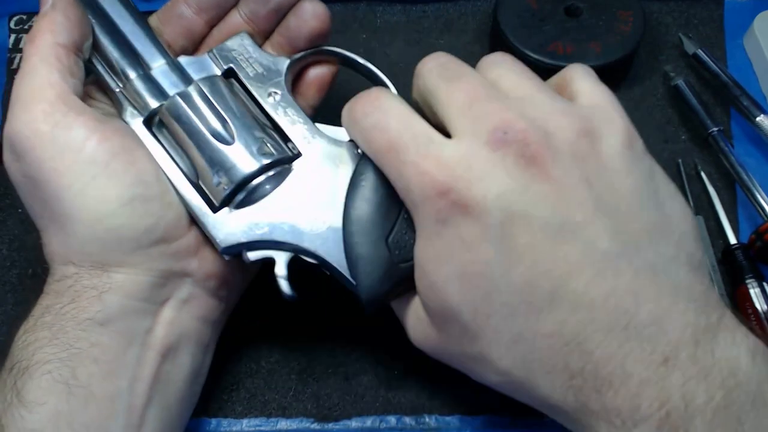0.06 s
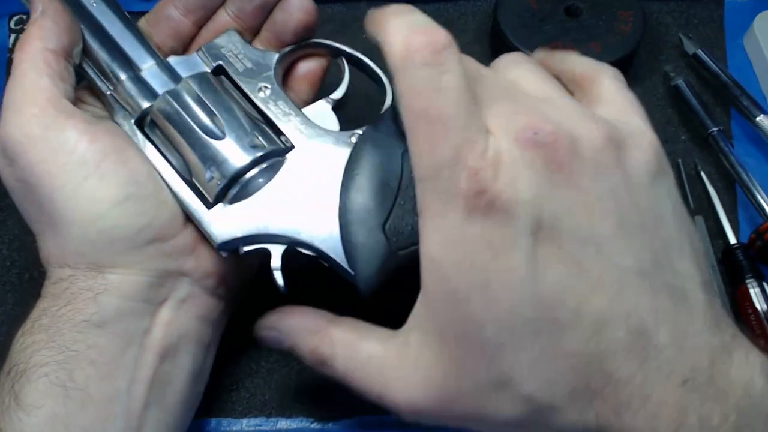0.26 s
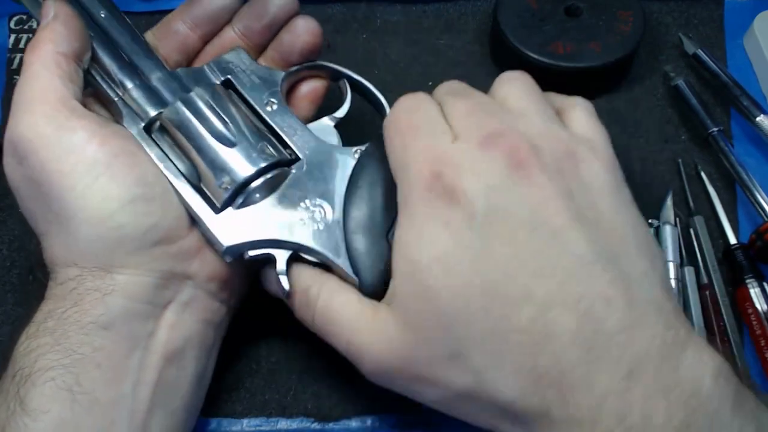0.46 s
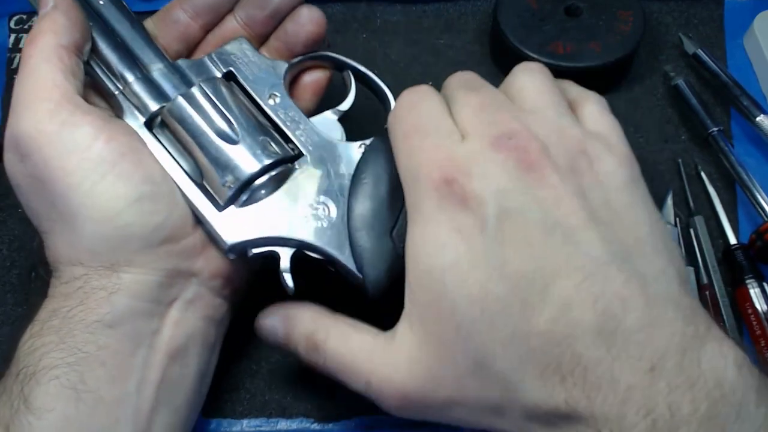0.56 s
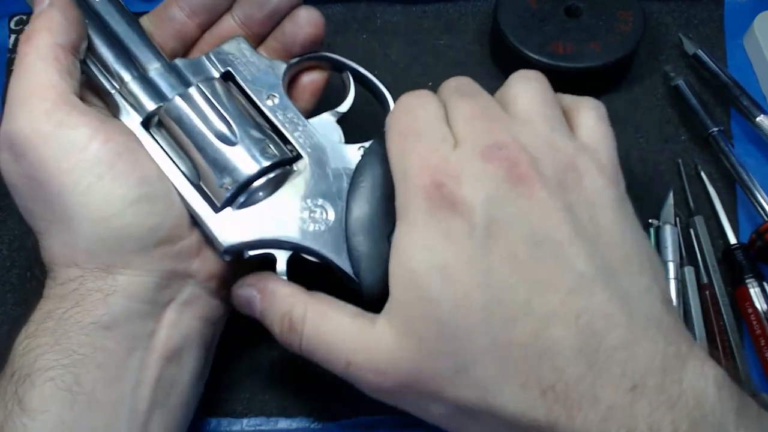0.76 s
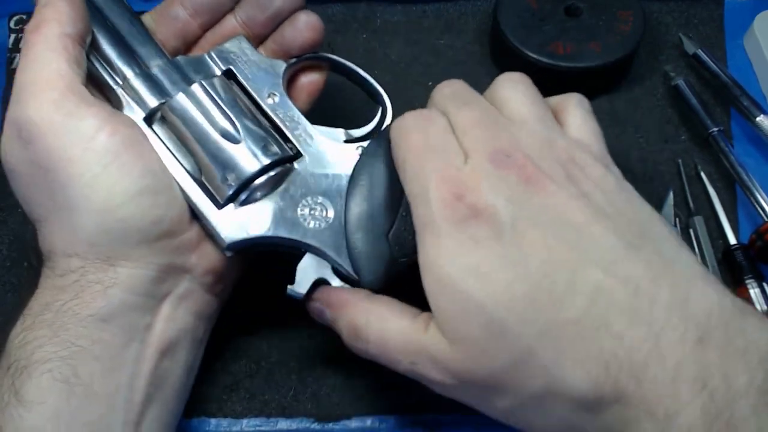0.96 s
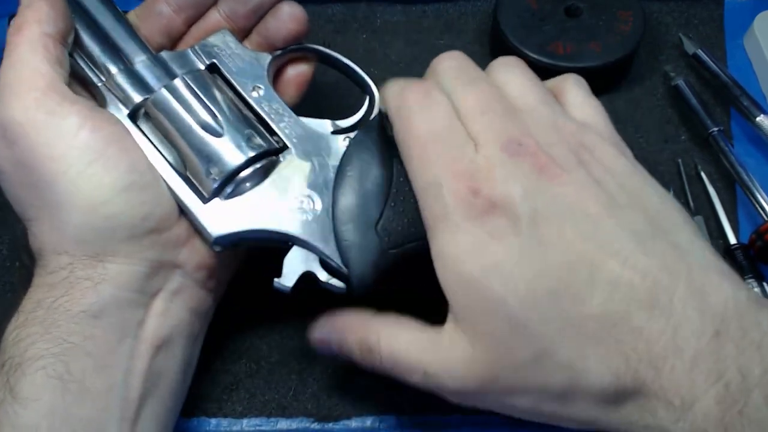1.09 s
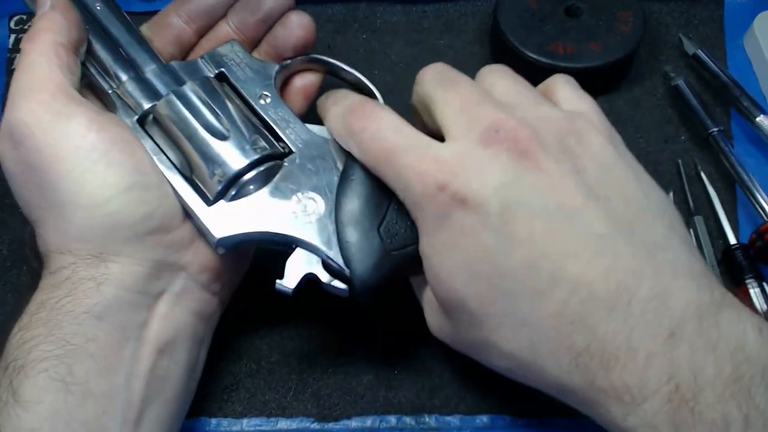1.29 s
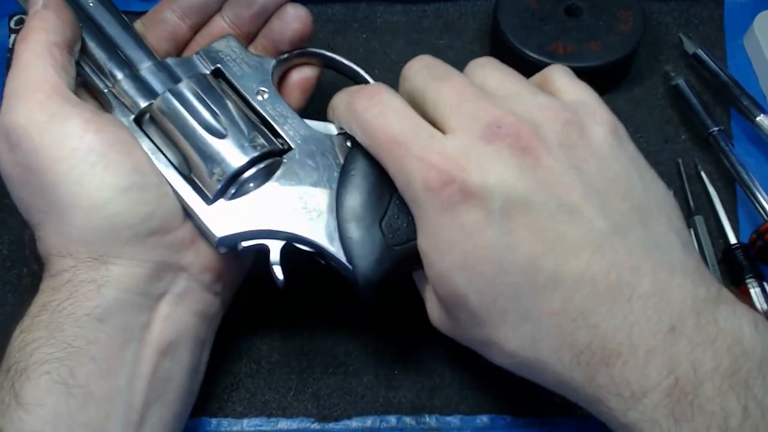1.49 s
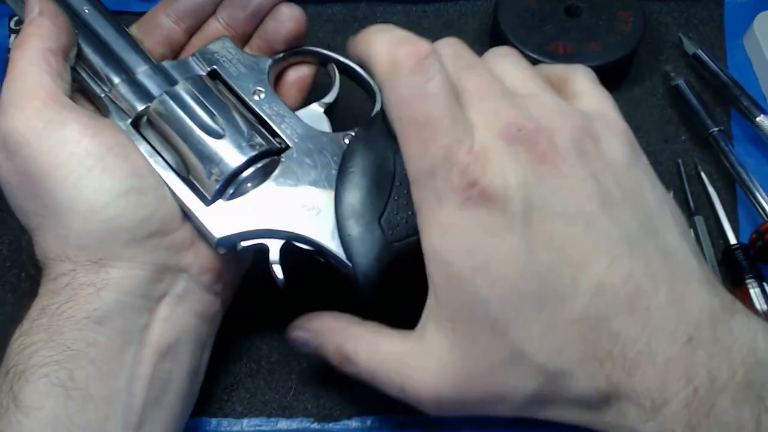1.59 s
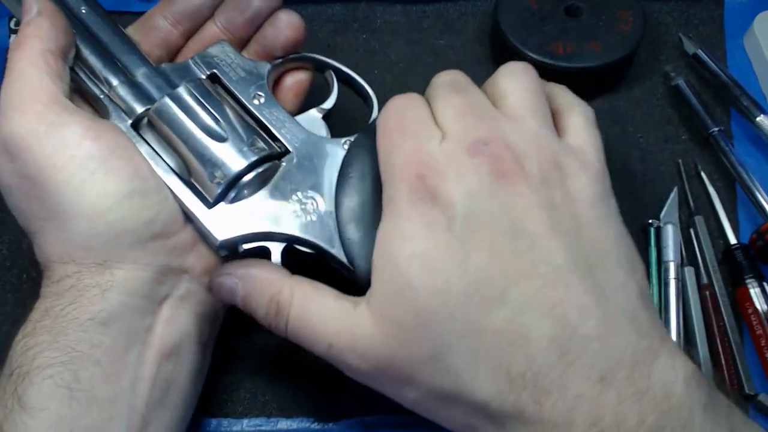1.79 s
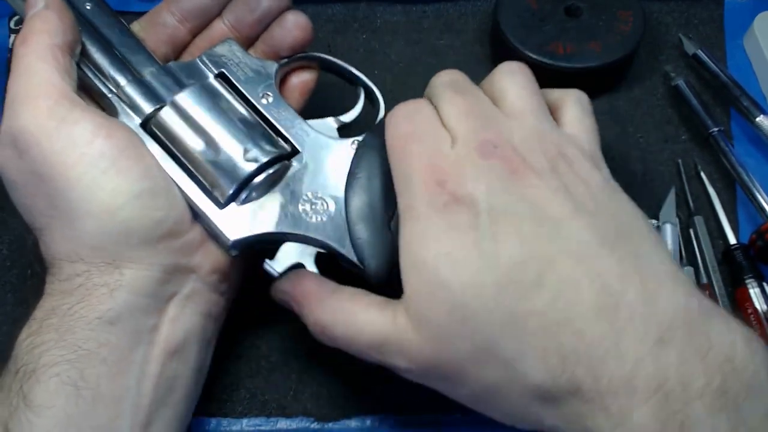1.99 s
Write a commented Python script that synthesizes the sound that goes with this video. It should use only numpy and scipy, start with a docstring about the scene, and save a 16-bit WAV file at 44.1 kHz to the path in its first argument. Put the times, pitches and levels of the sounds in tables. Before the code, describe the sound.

An empty revolver's hammer snaps twice, with crisp metallic trigger and cocking clicks.

```python
"""A faint rub of skin, then the sharp steel snap of a revolver's hammer, close to the microphone.
The trigger springs back, the hammer is thumbed to full cock with ticks and a knock, and both snap again.
Each impact is a burst of contact noise; the heavier ones also excite damped modes of the steel.
A bench and a small room with a faint fan hum reflect the clicks, and the loudest overload the recorder."""
import sys
import numpy as np
from scipy import signal
from scipy.fft import rfft, irfft, next_fast_len
from scipy.io import wavfile
from scipy.ndimage import map_coordinates

SR = 44100
rng = np.random.default_rng(int(sys.argv[2]) if len(sys.argv) > 2 else 0)


def int16_out(signal):
    """Quantize to a 16-bit WAV file."""
    q = np.round(np.clip(np.atleast_2d(signal).T, -1, 1) * 32767)
    wavfile.write(sys.argv[1], SR, q.astype(np.int16))


N = 90404
TAIL = SR // 4  # samples allowed for a decay
TOP_HZ, TICK_T60_S = 15650, 0.012  # upper band limit; decay time of a light contact

# spectrum of a light steel contact (f/Hz, level/dB)
TICK_SPECTRUM = [(100, -29), (1200, -13.5), (1900, -12.5), (2600, 1), (5000, -6.5), (7300, 3.5),
                 (10000, -5.5), (15500, 0)]


def hammer(contacts=3, rebound_s=0.0065, scatter_s=0.0003, loss_db=2.5):
    """Inelastic impact: the hammer strikes and rebounds, each weaker contact ringing the frame."""
    # hammer falls (t/s, level/dB, ring/dB, thump/dB)
    falls = [(0.2086, 2.5, 2.5, 3.5), (1.5492, 2.5, 0.5, -10)]
    # spectrum of the hammer's contact (f/Hz, level/dB)
    spectrum = [(40, -18.5), (230, -14.5), (380, -8.5), (600, -13), (1200, -9), (2600, 1.5), (5600, -2),
                (8000, 4), (11500, -2), (14800, 2.5)]
    # modes of the steel frame (f/Hz, level/dB, T60/s)
    frame_modes = [(2465, -5, .05), (2560, -3, .06), (2911, -1, .06), (2998, -2, .06), (3375, -5, .1),
                   (3645, -3, .08), (3860, -4, .1), (4965, -3, .1), (5400, -6, .09), (6519, -4, .09),
                   (7006, -1, .085), (7090, -4, .07), (7865, -5, .1), (8057, 0, .08), (8547, 0, .085),
                   (8675, -4, .07), (9114, -4, .07), (10107, -4, .08), (13675, -2, .085), (13825, -2, .09),
                   (14483, -2, .09), (14760, -2, .085), (15221, -2, .08)]
    # modes of the whole gun, damped by the hand (f/Hz, level/dB, T60/s)
    thump_modes = [(357, 0, 0.035), (530, 0, 0.055), (759, 1.5, 0.058), (1450, 1, .045)]
    out = np.zeros(N)
    for s, db, ring_db, thump_db in falls:
        blow = amp(thump_db - 21) * ring(thump_modes)
        for k in range(contacts):
            contact = clatter(spectrum, t60=0.028) + amp(ring_db - 17) * ring(frame_modes)
            delay_s = k * (rebound_s + scatter_s * rng.standard_normal())
            add(blow, delay_s, amp(-k * loss_db) * contact)
        sear = amp(db - 21) * clatter(TICK_SPECTRUM, TICK_T60_S)
        add(out, s - 0.0045, sear)  # the sear lets go just before the blow
        add(out, s, amp(db) * in_room(blow, wet_db=-1))
    return out


def trigger(slide_s=0.007, rise_s=0.0029):
    """Sliding friction, then impact: the released trigger scrapes forward and rings against its stop."""
    # trigger returns (t/s, level/dB, ring/dB, tilt/(dB per octave))
    returns = [(.348, -1.5, 5.5, -0.6), (1.6854, -2, 1, 0)]
    # spectrum of the contact with the stop (f/Hz, level/dB)
    spectrum = [(200, -10), (560, -16), (850, -2.5), (1300, -3), (1900, -6.5), (2600, 2), (3600, 2.5),
                (5500, -0.5), (8000, 1.5), (10500, -3), (13300, -3.5), (16000, -6.5)]
    # steel modes that the trigger excites (f/Hz, level/dB, T60/s)
    modes = [(2620, -1, 0.07), (2990, -3, .07), (3600, -3, .09), (3785, -2, 0.1), (3912, -3, 0.1),
             (5100, -6, 0.07), (6330, -3, 0.1), (6457, -2, .09), (7720, -2, 0.07), (9100, -5, .06),
             (12350, -5, .07), (13550, -4, .07)]
    out = np.zeros(N)
    t = np.arange(TAIL) / SR
    slide = np.minimum(t / rise_s, 1) ** 2 * (t < slide_s)
    for s, db, ring_db, tilt_db in returns:
        contact = clatter(tilted(spectrum, tilt_db), t60=0.014)
        snap = low_cut(contact + amp(ring_db - 24.5) * ring(modes), edge_hz=219.2)
        add(out, s - slide_s, amp(db - 17) * slide * noise(TICK_SPECTRUM, TAIL))
        add(out, s, amp(db) * in_room(snap, wet_db=-1))
    return out


def cocking():
    """Impulsive excitation: the cylinder knocks against its stop and the sprung sear snaps in."""
    # impacts of cylinder stop and sear (t/s, level/dB, ring/dB, knock/dB, spring/dB)
    impacts = [(1.0544, -8.5, -4, 0.5, -16), (1.0602, -18, -10, -21, -18), (1.0655, -10.5, 1.5, -8.5, -0.5)]
    # spectrum of these contacts (f/Hz, level/dB)
    spectrum = [(200, -22), (600, -9), (780, -2), (1900, 0), (3000, 1), (5000, -2.5), (8400, 0),
                (10000, -7), (15500, -4)]
    # ringing modes of the cylinder (f/Hz, level/dB, T60/s)
    cylinder_modes = [(870, -7, 0.045), (1620, -4, .05), (1810, -4, 0.06), (3790, -5, .09), (3900, -3, 0.1),
                      (3990, -5, 0.07), (5200, -5, 0.05), (7970, -5, .055), (8135, -7, .05),
                      (8320, -6, 0.05)]
    # heavily damped modes of the cylinder hitting its stop (f/Hz, level/dB, T60/s)
    knock_modes = [(830, -3, .016), (1290, 1, 0.0093), (1650, 1.5, 0.019), (2100, -0.5, 0.0092),
                   (2900, -3, .013)]
    # modes of the sear spring (f/Hz, level/dB, T60/s)
    spring_modes = [(3750, -1.5, 0.015), (3970, -0.5, 0.014)]
    out = np.zeros(N)
    for s, db, ring_db, knock_db, spring_db in impacts:
        knock = amp(knock_db - 1) * ring(knock_modes)
        spring = amp(spring_db + 7) * ring(spring_modes)
        steel = clatter(spectrum, t60=0.01) + amp(ring_db - 13.5) * ring(cylinder_modes)
        click = low_cut(knock + spring + steel, edge_hz=630)
        add(out, s, amp(db) * in_room(click, wet_db=-2.5))
    return out


def pawl():
    """Light impacts: the pawl and other loose parts radiate brief broadband ticks."""
    # ticks (t/s, level/dB, tilt/(dB per octave))
    ticks = [(.521, -57.5, -5), (.595, -54.5, -7), (0.697, -57.5, -2), (0.964, -57, -1), (0.982, -48, 0),
             (0.989, -45, 0.5), (1.0034, -38.5, -4.5), (1.0232, -27, 0), (1.049, -47, -5.5),
             (1.201, -51, -7), (1.215, -52, -10), (1.236, -56.5, 4), (2.042, -34, -4.5)]
    out = np.zeros(N)
    for s, db, tilt_db in ticks:
        tick = clatter(tilted(TICK_SPECTRUM, tilt_db), TICK_T60_S)
        add(out, s, amp(db) * in_room(tick, wet_db=2))
    return out


def clatter(spectrum, t60, hold_s=0.0018):
    """Modal overlap: a contact's dense resonances merge into noise that holds briefly, then decays."""
    envelope = np.minimum(1, decay(t60) * np.exp(np.log(1000) * hold_s / t60))
    return envelope * noise(spectrum, TAIL)


def ring(modes, linewidth_hz=14):
    """Free vibration: damped modes start from rest; loose parts broaden each line by phase diffusion."""
    t = np.arange(TAIL) / SR
    out = np.zeros(TAIL)
    for k, (hz, db, t60) in enumerate(modes):
        phase_walk = np.cumsum(rng.standard_normal(TAIL)) * np.sqrt(2 * np.pi * linewidth_hz / SR)
        out += (-1) ** k * amp(db) * decay(t60) * np.sin(2 * np.pi * hz * t + phase_walk)
    return out


def low_cut(x, edge_hz):
    """Radiation efficiency: a small part gives off little sound below edge_hz."""
    return signal.sosfilt(signal.butter(4, edge_hz, "high", fs=SR, output="sos"), x)


def hands():
    """Friction noise: skin on the frame and grip swells and fades with each movement."""
    # rubs on the frame (t/s, duration/s, level/dB)
    rubs = [(.005, 0.086, -41.5), (1.279, 0.015, -45.5), (1.295, 0.095, -41), (1.365, 0.024, -48)]
    # spectrum of skin on steel (f/Hz, level/dB)
    rub_spectrum = [(200, -19), (700, -9), (1150, 3), (1600, -7), (2600, -20.5), (5000, -27), (9000, -26.5),
                    (15000, -43)]
    # shifts of the hand on the grip (t/s, duration/s, level/dB)
    shifts = [(.44, .3, -65.5), (1.77, 0.33, -70)]
    # spectrum of skin on the grip (f/Hz, level/dB)
    shift_spectrum = [(200, -5), (2000, -2), (6500, -1), (15000, -16)]
    t = np.arange(N) / SR
    out = np.zeros(N)
    for strokes, spectrum in (rubs, rub_spectrum), (shifts, shift_spectrum):
        friction = noise(spectrum, N)
        for s, duration, db in strokes:
            progress = np.clip((t - s) / duration, 0, 1)
            out += amp(db) * np.sin(np.pi * progress) * friction
    return out


def in_room(x, wet_db, bench_db=-9, bench_t60=0.098, room_db=-12.5, delay_s=0.006, size=256):
    """Diffuse reverberation follows x: each band's energy decays fast at the bench, slower in the room."""
    # reverberation time of the room (f/Hz, T60/s)
    room_t60 = [(200, 0.36), (1000, 0.18), (3500, 0.23), (8000, 0.17), (15000, 0.11)]
    # spectral weighting of the reflections (f/Hz, level/dB)
    spectrum = [(200, -9), (1000, -3.5), (3000, -2), (8000, -2.5), (15000, 0.5)]
    hz, t, direct = signal.stft(np.pad(x, (0, TAIL)), SR, nperseg=size)

    def linger(t60):
        """Exponential energy decay, normalised to unit sum."""
        rate = np.log(1e6) / t60
        return np.exp(-rate * t) * (1 - np.exp(-rate * t[1]))

    early = amp(bench_db) ** 2 * linger(bench_t60)
    late = amp(room_db) ** 2 * linger(along(room_t60, hz)[:, None])
    energy = np.abs(signal.fftconvolve(np.abs(direct) ** 2, early + late, axes=1))[:, :len(t)]
    scatter = signal.stft(rng.standard_normal(len(x) + TAIL), nperseg=size)[2]
    diffuse = scatter / scatter.std() * np.sqrt(energy) * amp(along(spectrum, hz))[:, None]
    echo = signal.istft(diffuse, nperseg=size)[1]
    out = np.zeros(len(echo))
    add(out, 0, x)
    add(out, delay_s, amp(wet_db) * echo)
    return out


def background(waver_rad=0.28, drift_per_s=8):
    """Line and continuous spectra: a fan's tones, randomly phase-modulated, over the room's rumble."""
    # tones of the fan (f/Hz, rms level/dB)
    fan_tones = [(226, -58.5), (328, -63.5), (452, -61), (581, -65), (990, -63.5), (1130, -67)]
    # spectrum of the rumble (f/Hz, level/dB)
    spectrum = [(15, -27.5), (25, 9.5), (39, -11.5), (80, -4.5), (114, -5.5), (157, -7), (195, -9.5),
                (335, -3), (384, -11), (489, -12), (775, -18), (1020, -17.5), (1560, -22.5), (3340, -32.5),
                (16000, -51.5)]
    t = np.arange(N) / SR
    hum = np.zeros(N)
    for hz, db in fan_tones:
        drift = map_coordinates(rng.standard_normal(64), [t * drift_per_s], mode="wrap")
        hum += amp(db) * np.sqrt(2) * np.sin(2 * np.pi * hz * t + waver_rad * drift)
    return hum + amp(-45.5) * noise(spectrum, N)


def noise(spectrum, size):
    """Spectral shaping: white noise filtered to a spectrum and the band limit, at unit rms."""
    hz = np.fft.rfftfreq(size, 1 / SR)
    passband = 1 / np.sqrt(1 + (hz / TOP_HZ) ** 80)
    white = rfft(rng.standard_normal(size))
    x = irfft(white * amp(along(spectrum, hz)) * passband, size)
    return x / np.sqrt(np.mean(x ** 2) + 1e-20)


def decay(t60):
    """Exponential damping: the amplitude falls 60 dB in t60 seconds."""
    return np.exp(-np.log(1000) * np.arange(TAIL) / SR / t60)


def tilted(spectrum, tilt_db):
    """Spectral tilt: a slope of tilt_db per octave brightens or dulls the sound."""
    return [(hz, db + tilt_db * np.log2(hz)) for hz, db in spectrum]


def along(points, hz):
    """Interpolation of (f/Hz, value) points on a logarithmic frequency axis."""
    f, values = np.transpose(points)
    return np.interp(np.log(hz + 1), np.log(f + 1), values)


def amp(db):
    """Amplitude ratio of a level in decibels."""
    return 10 ** (np.asarray(db) / 20)


def add(track, s, x):
    """Superposition of x on the track, starting at s seconds."""
    i = max(round(s * SR), 0)
    track[i:i + len(x)] += x[:max(len(track) - i, 0)]


def scene():
    """Superposition: the action, the hands and the room sum at one microphone."""
    return (hammer() + trigger() + cocking() + pawl() + hands() + background())[None]


def record(dry, ceiling=0.78, hardness=2.1):
    """Saturation: overload flattens the envelope of the loud snaps; a low-pass then limits the band."""
    size = next_fast_len(N + TAIL)
    envelope = np.abs(signal.hilbert(dry, size))[:, :N]
    limited = dry / (1 + (envelope / ceiling) ** hardness) ** (1 / hardness)
    hz = np.fft.rfftfreq(size, 1 / SR)
    passband = 1 / np.sqrt(1 + (hz / TOP_HZ) ** 200)
    return irfft(rfft(limited, size) * passband, size)[:, :N]


dry = scene()
out = record(dry)
int16_out(out)
```